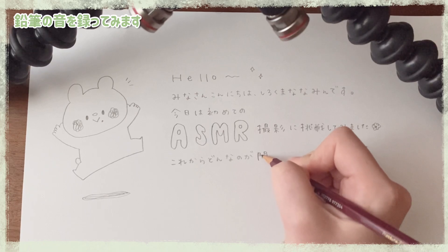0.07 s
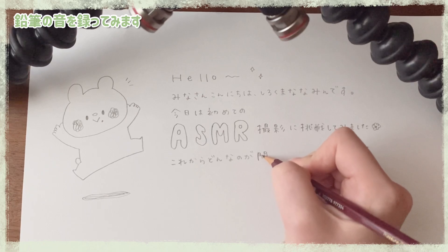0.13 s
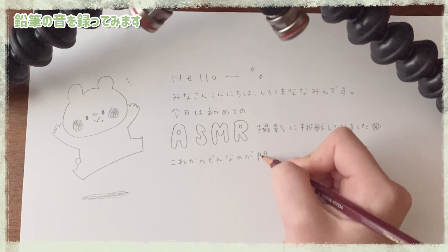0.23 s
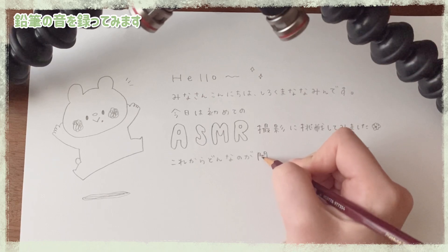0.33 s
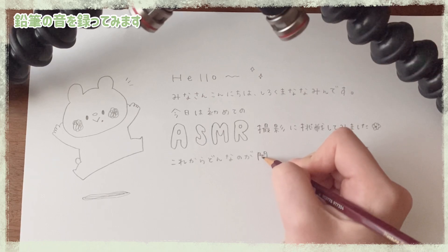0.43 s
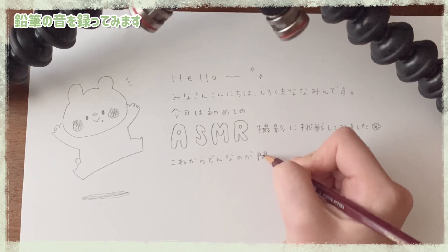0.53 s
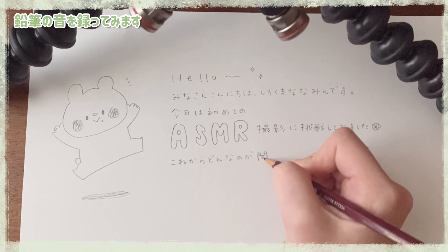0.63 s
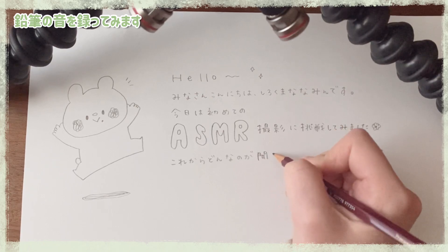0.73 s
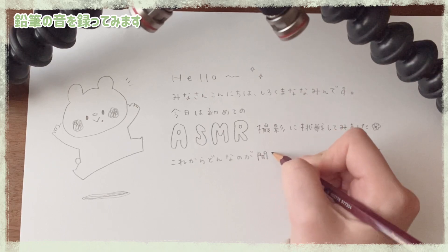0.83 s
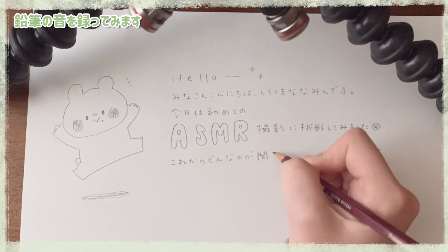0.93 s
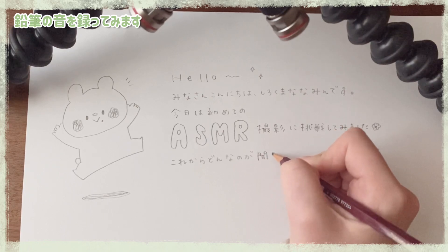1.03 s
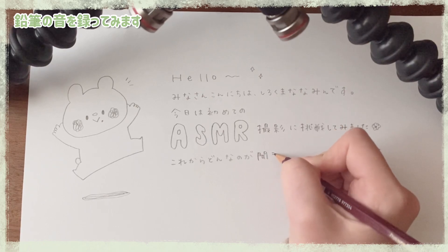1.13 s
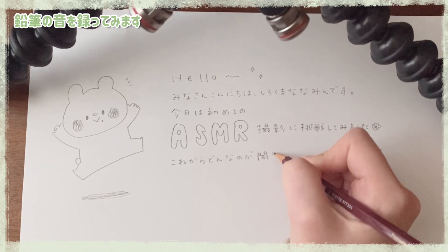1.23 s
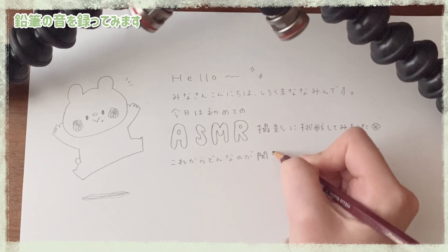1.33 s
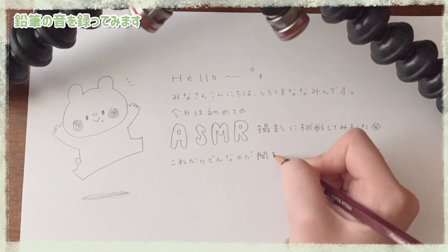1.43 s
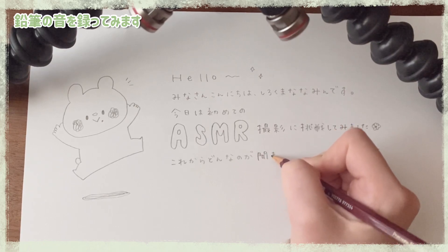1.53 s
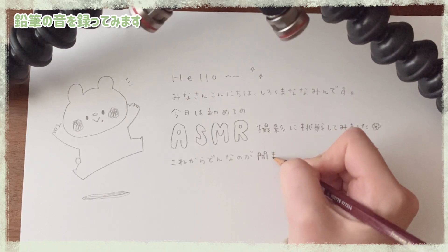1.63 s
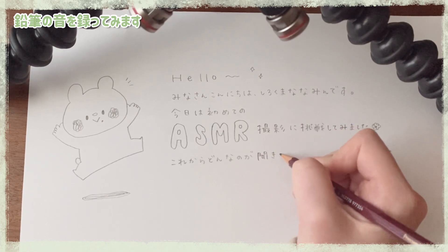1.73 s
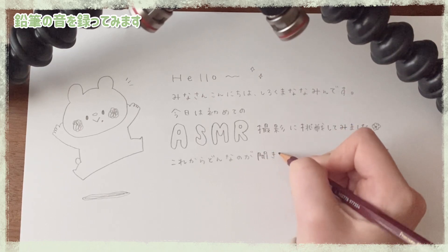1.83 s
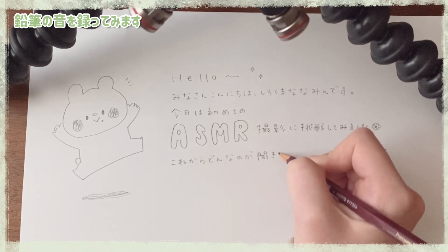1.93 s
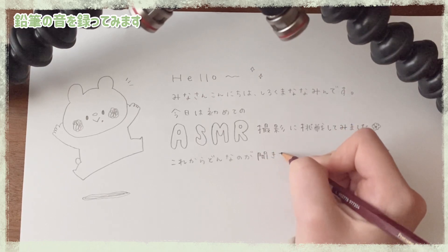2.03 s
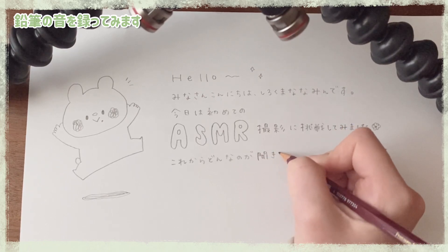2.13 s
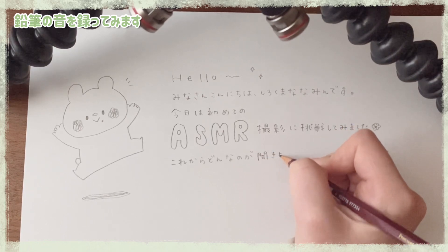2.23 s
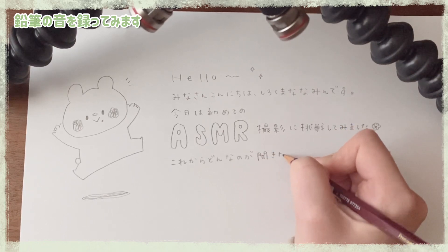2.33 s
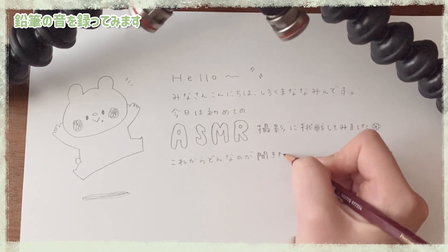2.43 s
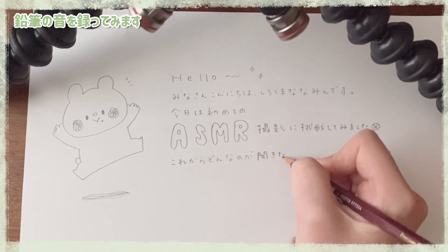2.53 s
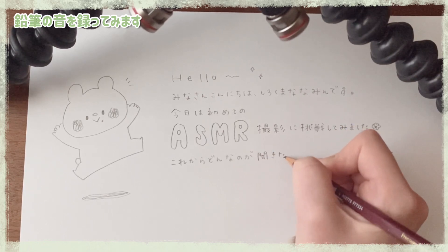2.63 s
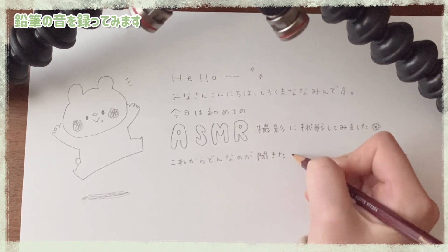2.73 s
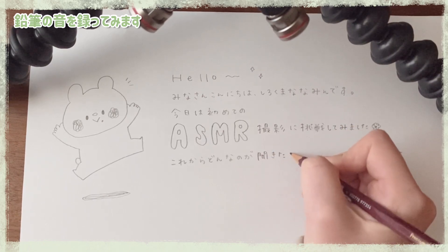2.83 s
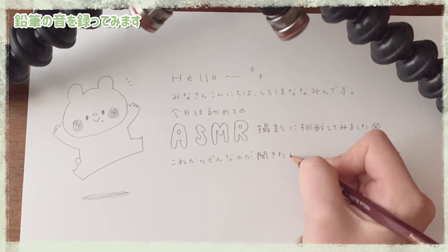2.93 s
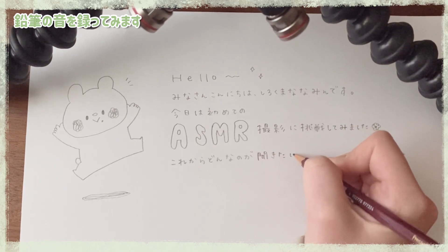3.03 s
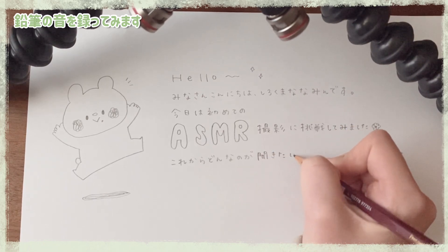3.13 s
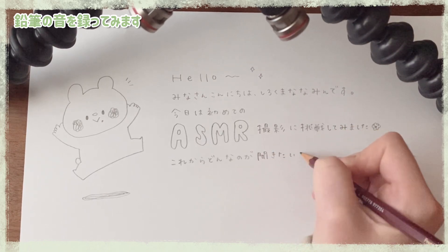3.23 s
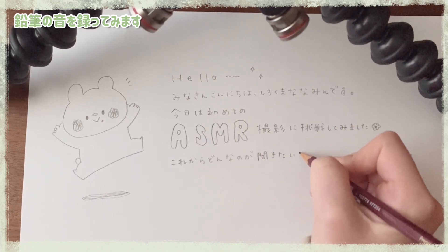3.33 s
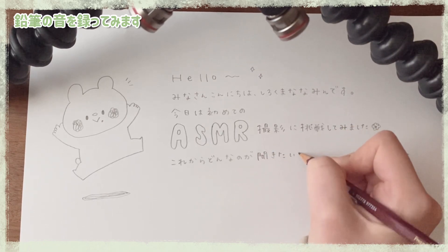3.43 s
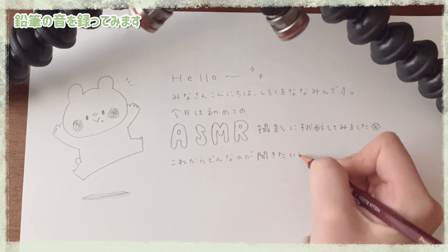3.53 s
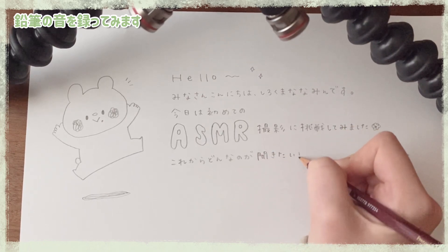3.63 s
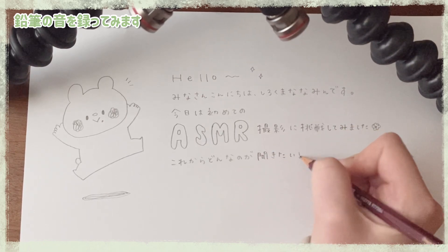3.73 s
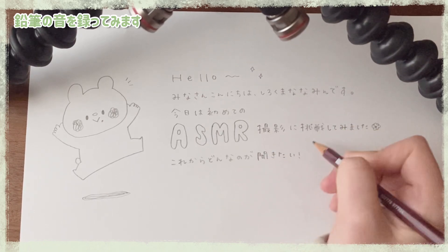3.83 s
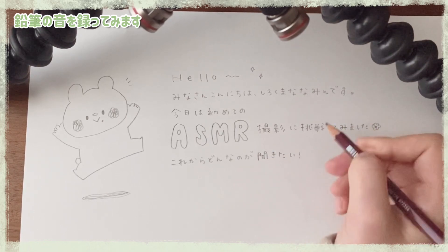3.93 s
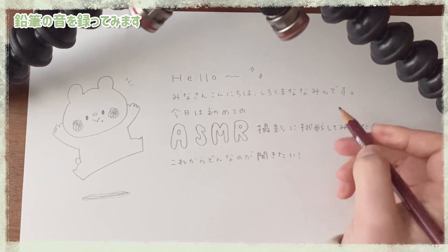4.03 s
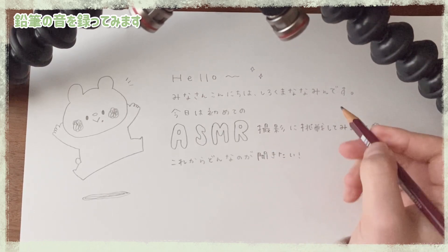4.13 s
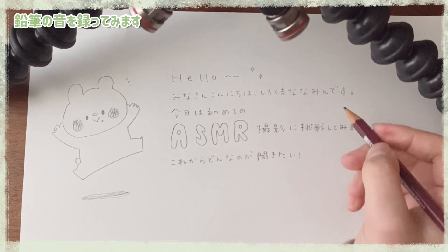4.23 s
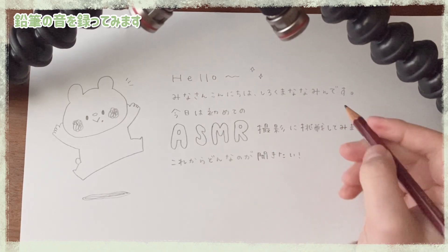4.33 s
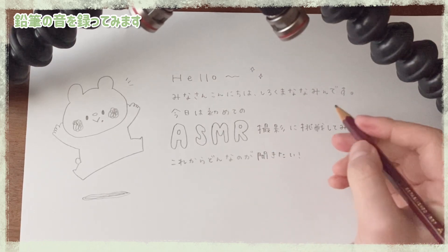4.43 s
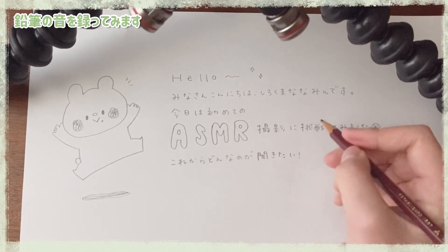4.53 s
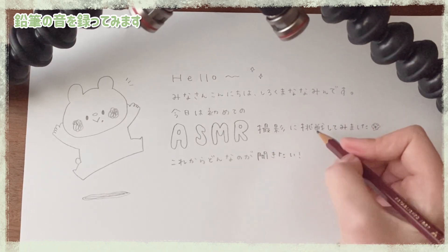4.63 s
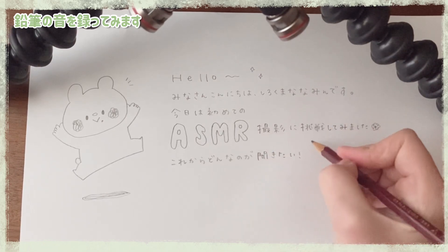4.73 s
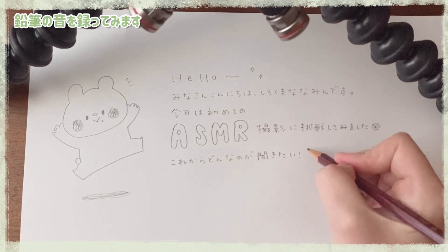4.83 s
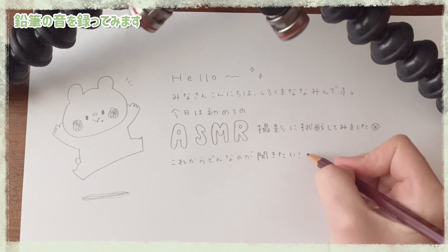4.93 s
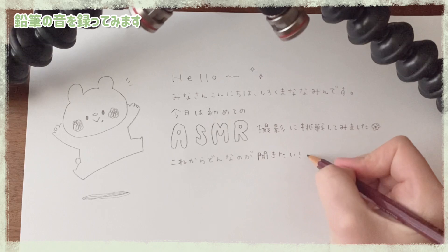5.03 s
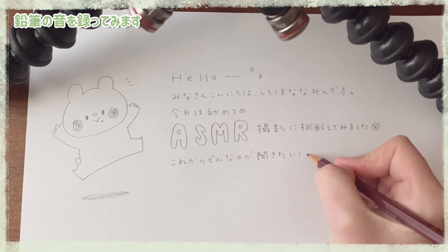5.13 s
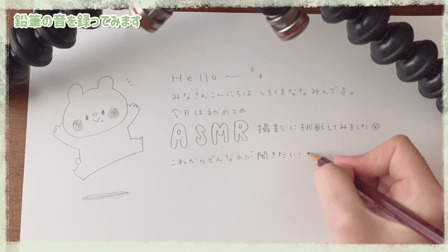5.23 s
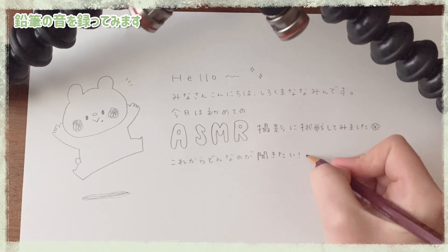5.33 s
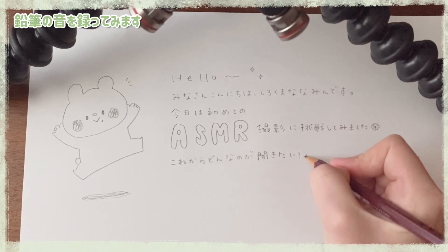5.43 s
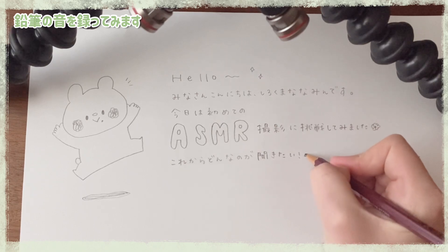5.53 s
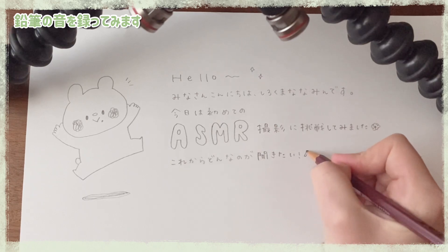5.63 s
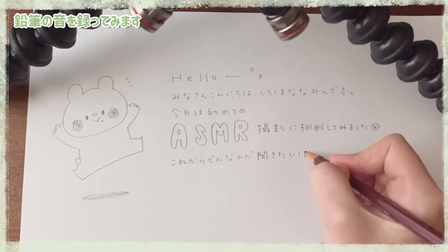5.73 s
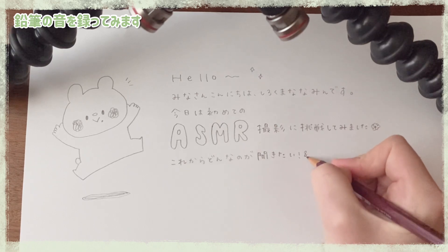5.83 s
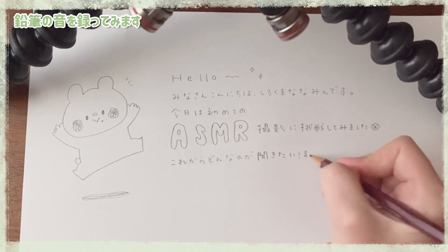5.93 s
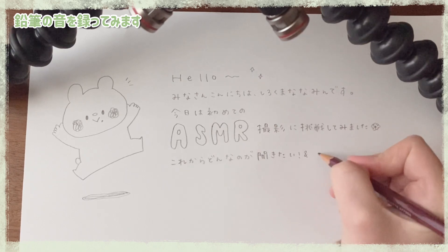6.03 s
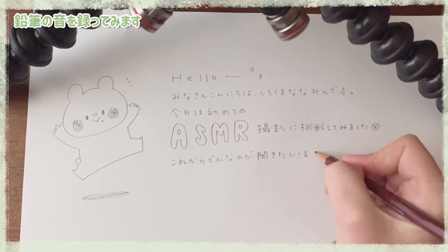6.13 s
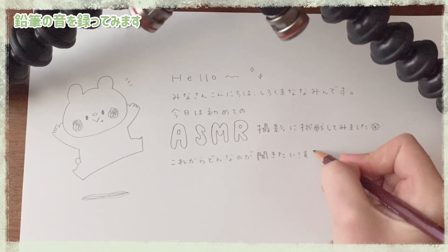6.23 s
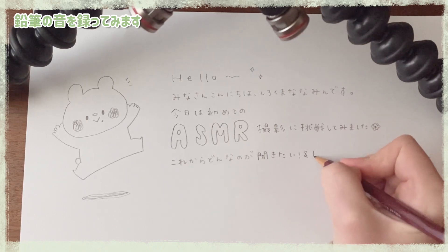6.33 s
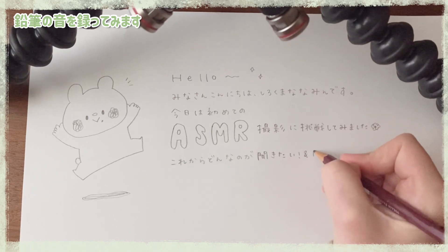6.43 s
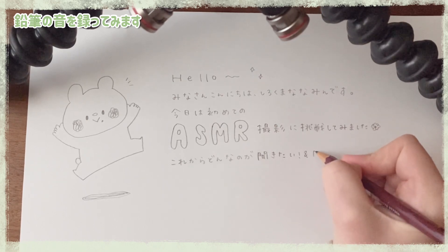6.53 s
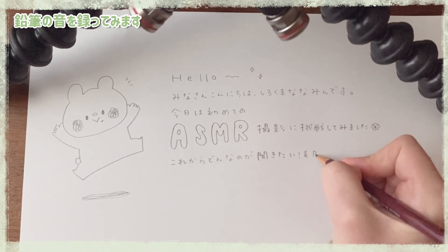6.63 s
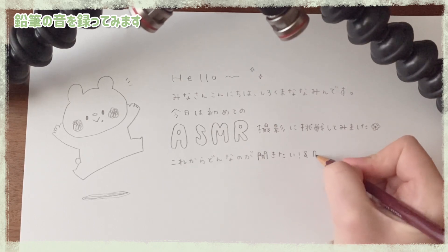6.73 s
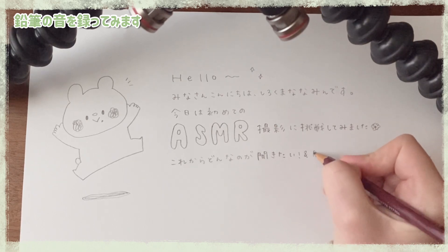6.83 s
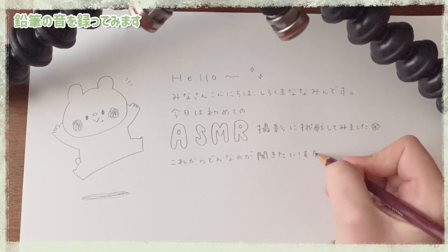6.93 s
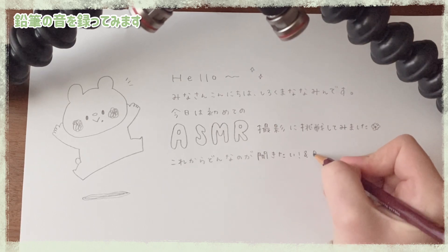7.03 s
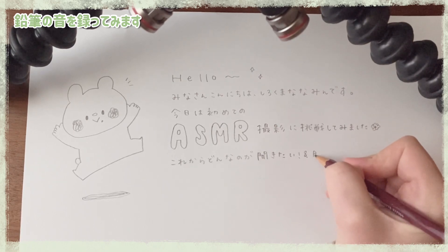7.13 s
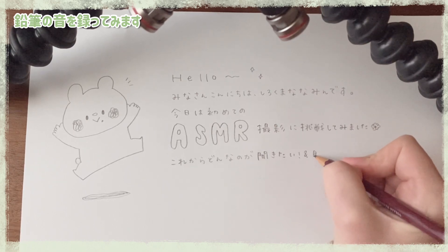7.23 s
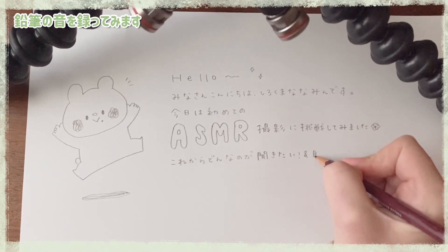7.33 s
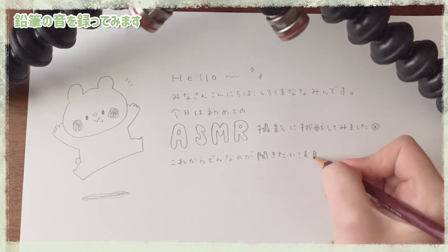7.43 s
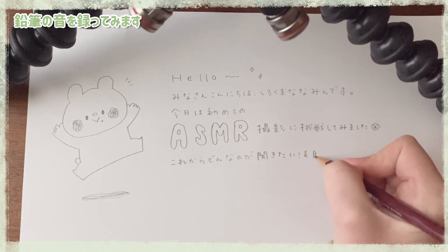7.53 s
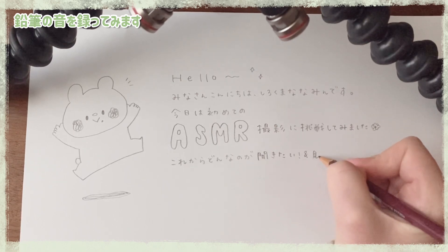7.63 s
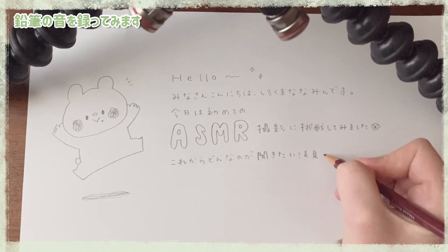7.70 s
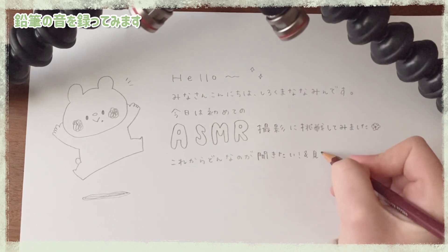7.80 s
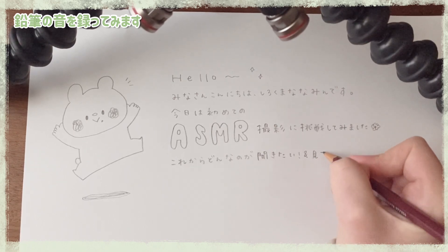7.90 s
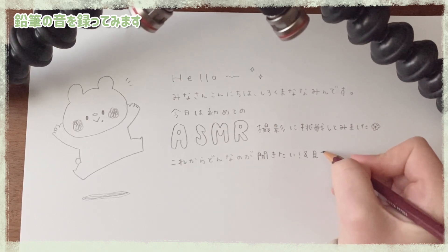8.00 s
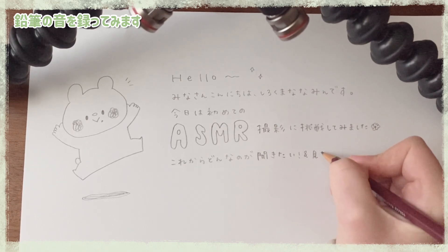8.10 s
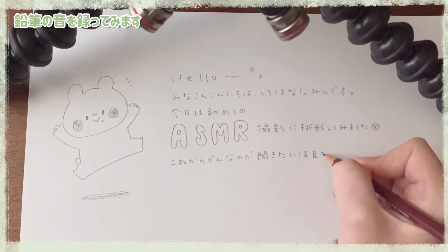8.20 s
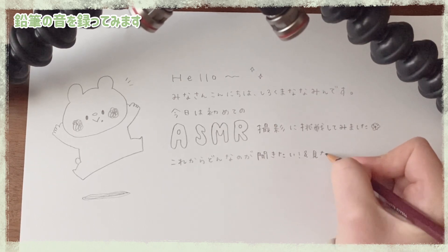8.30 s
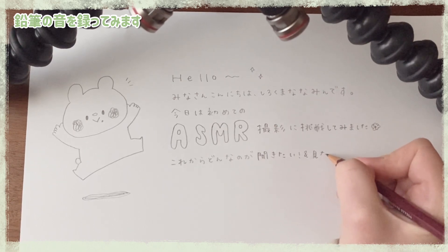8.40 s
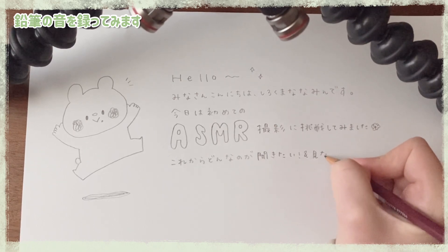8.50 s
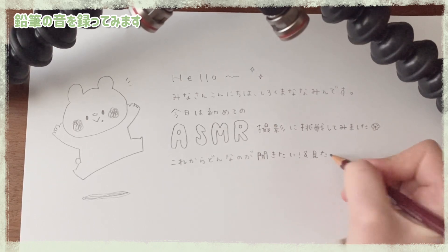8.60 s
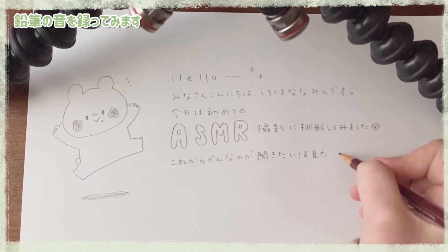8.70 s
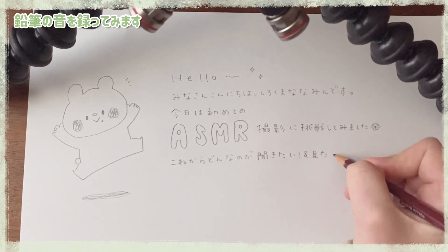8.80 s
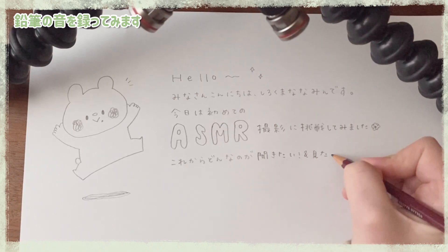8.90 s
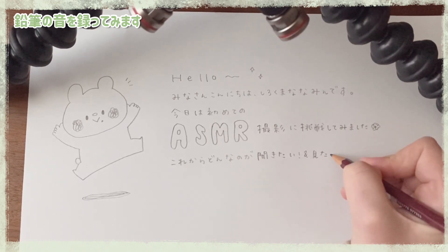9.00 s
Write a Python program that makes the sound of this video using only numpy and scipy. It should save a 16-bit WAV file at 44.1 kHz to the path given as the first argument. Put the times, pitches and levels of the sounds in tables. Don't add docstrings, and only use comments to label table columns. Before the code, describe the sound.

Very close stereo sound of a pencil on paper on a wooden desk, in a quiet room with faint low hum and soft microphone hiss. From 0 to 3.7 seconds, small characters are written: each tip landing gives a short woody knock, followed by a dry, bright scratch of about a tenth of a second, three to five strokes per second, irregular. A stronger knock falls near 2.35. Soft skin brushes pass at 0.7, 1.7, 2.7 and 3.2, with low rumble from the shifting hand. From about 3.8 to 5.3 the pencil lifts; only faint sliding, dull finger ticks and tiny crackles remain. Writing resumes at 5.3 with a light tap and softer overlapping scratches, a broad hand brush near 6, then crisper knocks and clear strokes from 6.2 to 8.6. A final brush and paper tick come around 8.6, then small ticks and quiet to about 9.

```python
import sys
import numpy as np
from scipy import signal
from scipy.fft import rfft, irfft
from scipy.io import wavfile
from scipy.ndimage import uniform_filter1d

SR = 44100
rng = np.random.default_rng(int(sys.argv[2]) if len(sys.argv) > 2 else 0)


def unload_wav(signal):
    wavfile.write(
        sys.argv[1],
        SR,
        np.round(np.clip(np.atleast_2d(signal).T, -1, 1) * 32767).astype(np.int16),
    )


def ratio(d):
    e = np.asarray(d, float) / 20
    return 10 ** e


N = 399546
TIME = np.arange(N) / SR
RIGHT_LAG = 4

# pitch in Hz, level in dB per Hz.
ROOM_COLOUR = [(26, -38), (45, -23), (112, 5.5), (182, -4.5), (244, -10.5), (283, 0.5), (320, -5.5),
               (353, -8.5), (419, -7), (462, -4.5), (719, -8.5), (919, -11.5), (1330, -17.5), (4200, -23.5),
               (15800, -27.5)]
ROOM_DB = -60.5
# pitch in Hz, level in dB, size and sign at the right microphone (left is 1).
HUM = [(50, -55, -1), (282.3, -72.5, 0.96), (352, -82, 0.5), (468.4, -69.5, 0.016), (543, -85, -0.093),
       (797, -72.5, -0.16), (1553, -86, 1)]

# pitch in Hz, width in Hz, level in dB.
STAND = [(4, 6, -2), (17, 8, -2), (24.5, 5, 2), (38, 7, -12), (52, 5, -13), (80, 12, -12)]
# time in seconds, stand rocking in dB.
REST = [(0, -47), (3.7, -42.5), (4.2, -52), (4.9, -49), (5.25, -51.5), (5.8, -44), (6.5, -48), (8.7, -45),
        (9.06, -52)]
REST_PRESS_DB = -19.5
# time in seconds, stand rocking in
# dB, pressure on the desk in dB.
SHIFTS = [(0.0, -33, -51), (0.2, -41, -51), (0.36, -38.5, -54.5), (0.5, -36.5, -49), (0.64, -35, -47),
          (0.93, -42, -64), (1.03, -50, -53), (1.16, -42, -65), (1.39, -34.5, -59), (1.51, -38.5, -52),
          (1.72, -37, -47.5), (1.99, -38, -71), (2.19, -36, -52), (2.32, -48, -50), (2.43, -34, -50),
          (2.66, -33.5, -55), (2.92, -31.5, -49), (3.05, -35.5, -51.5), (3.199, -34, -64),
          (3.47, -32.5, -63), (3.72, -38, -48.5), (3.9, -42, -65),
          (4.99, -47.5, -60), (5.53, -40.5, -57), (5.58, -42, -47), (5.95, -36, -47),
                (6.03, -38.5, -60), (6.31, -38, -67), (6.79, -36, -52), (7.06, -35.5, -54),
                (7.15, -38, -46), (7.27, -39.5, -51), (7.47, -41, -58), (7.63, -38.5, -47),
                (7.73, -39.5, -66), (7.89, -35.5, -53), (8.15, -34, -50), (8.4, -41, -62), (8.65, -32, -62)]
SHIFT_RISE_S, ROCK_FALL_S, PRESS_FALL_S = 0.068, 0.12, 0.038

# pitch in Hz, time to fall by 60 dB in seconds,
# signed strength at the left and at the right microphone in thousandths.
DESK = [(30.8, 0.098, -61.7, 7.9), (45.8, 0.121, 39.3, 11.8), (69.0, 0.231, 16.4, -16.6),
        (100.2, 0.048, -41.8, 99.3), (109.5, 0.117, 44.7, -29.9), (135.0, 0.24, 13.0, 4.1),
        (171.2, 0.043, -17.2, -36.9), (213.2, 0.067, 83.4, 31.9), (223.1, 0.07, -76.6, -12.9),
        (255.2, 0.049, 6.1, -29.2), (315.1, 0.11, -5.4, -9.4), (422.0, 0.085, -10.0, -4.4),
        (459.8, 0.054, -13.4, -10.3), (515.0, 0.037, -8.8, -16.2), (621.1, 0.025, -9.9, -14.6),
        (724.0, 0.13, -3.3, -3.5), (804.4, 0.052, 4.9, 13.5), (888.0, 0.061, 13.6, 6.2),
        (947.7, 0.076, -6.8, -8.2), (1108.2, 0.024, -27.9, 5.4), (1157.9, 0.004, -12.1, -82.5),
        (1471.2, 0.037, 7.2, -10.7), (2104.5, 0.013, -130.1, -86.1), (3248.1, 0.009, -255.2, -31.5)]
DIRECT = (-.63, -.15)

# time in seconds, level in dB, pitch in Hz, left minus right in dB.
TICKS = [(0.3721, -51, 1460, -5), (1.2471, -54, 1200, -1), (1.527, -49, 1260, -2.5),
         (2.0797, -48, 1210, -2.5), (2.2944, -49, 1470, -0.5), (2.689, -45, 1500, 0), (2.992, -51, 2000, 0),
         (3.213, -50, 1500, 0), (3.395, -50, 1800, 0), (4.2714, -58, 7670, 1.0), (4.2904, -54, 1503, 0.5),
         (3.7952, -45, 1610, 1), (3.9259, -51, 923, 1.5), (4.5612, -46.5, 1360, -3), (4.8309, -44, 985, 1),
         (5.108, -48, 1200, -6), (5.3844, -51, 1390, 1.0), (5.9376, -49, 1200, 3), (6.4174, -49, 1220, 0.5),
         (6.724, -50, 2020, 1.0), (6.7594, -46.5, 1550, -2), (8.411, -48, 1220, -0.5),
         (8.4344, -51, 1230, 1.0), (8.6227, -40, 1450, 6), (8.9044, -50, 1400, -4),
         (8.9537, -51, 1590, 0.0)]
# time in seconds, level in dB, pitch in Hz, left minus right in dB.
CRACKLES = [(0.8861, -55, 12000, 4.0), (1.694, -46, 10400, 5), (3.9794, -52, 7540, 0.0),
            (4.4, -49, 8000, 3.0), (4.4308, -49, 8000, 1.5), (5.2697, -51, 8500, 8),
            (6.2220, -47, 11500, 7), (6.4406, -55, 11000, 2.0), (6.749, -54, 10900, 0.5),
            (6.851, -53, 11500, 3.0), (7.8453, -54, 11500, 3.5), (8.2879, -44.5, 11000, 6),
            (8.4922, -51, 9500, 3.0), (8.6227, -47, 9000, 3)]
TICK_FADE_MS, CRACKLE_FADE_MS = 1.5, 0.6

# start in seconds, rise in ms, fall in ms, high level in dB,
# middle over high in dB.
SLIDES = [(0.7, 45, 39, -60.5, 0.5), (1.723, 47, 41, -55.5, 3), (2.684, 63, 49, -55.5, 4),
          (3.209, 50, 58, -53.5, 1.5), (3.788, 20, 71, -63, -1), (3.9, 140, 190, -64.5, -0.5),
          (3.96, 11, 10, -71, -11), (4.15, 160, 300, -75, 7), (4.257, 12, 33, -75, -12),
          (4.379, 25, 63, -71.5, -19), (4.526, 27, 24, -66, -18), (4.7, 43, 150, -67, -1.5),
          (5.966, 44, 52, -50, -0.5), (7.6, 36, 16, -63, 0), (7.67, 13, 58, -62, -3),
          (8.628, 61, 84, -48, 0)]
LOW_UNDER_MIDDLE_DB = -3
# pitch in Hz, width in Hz, level in dB.
SKIN = [
    [(7570, 1700, 6), (10900, 2100, 4), (13500, 3200, 0)],
    [(3140, 790, 0), (4780, 2060, 0)],
    [(2090, 340, 0), (1480, 250, -1.5), (960, 500, -6.5)],
]

# start in seconds, rise in ms, fall in ms, paper hiss
# in dB, grip in dB.
STROKES = [(0.092, 10, 58, -61, -2), (0.265, 15, 38, -61, -1.5), (0.434, 24, 30, -58, -1.5),
           (0.595, 23, 42, -49.5, -0.5), (0.918, 27, 41, -58, 0.5), (1.104, 29, 57, -58, -1),
           (1.368, 14, 58, -48.5, -0.5), (1.603, 15, 93, -58.5, 0.5), (1.958, 23, 57, -59, 2.5),
           (2.157, 30, 43, -49, 1.5), (2.261, 7.4, 45, -69, -6.5), (2.386, 4.5, 36, -56, -1.5),
           (2.582, 72, 9.6, -61, 0), (2.911, 13.3, 48, -50, 0), (3.008, 11, 6.8, -54.5, -10),
           (3.129, 16.5, 41, -54, 1), (3.451, 12.5, 51, -51.5, 0), (3.652, 20, 48, -64, -1),
           (5.322, 10, 51, -59.5, -3), (5.404, 19, 93, -66.5, 0), (5.524, 53, 118, -56.5, 2.5),
                 (5.7, 36, 25, -63, -1.5), (5.755, 70, 74, -53.5, -2), (5.897, 13, 13, -63, -8),
                 (6.275, 16, 70, -46.5, -1), (6.459, 5.3, 15, -61.5, -4), (6.497, 22, 72, -60.5, -3.5),
                 (6.612, 62, 33, -51, 1.5), (6.885, 19, 36, -58.5, -0.5), (7.073, 20, 32, -59.5, -2.5),
                 (7.248, 20, 38, -57.5, -0.5), (7.332, 87, 20, -61.5, -3), (7.551, 18, 94, -58, -1),
                 (7.892, 10.5, 62, -56.5, 0.5), (8.114, 26, 50, -51.5, 0), (8.31, 18, 50, -59, 0),
                 (8.53, 24, 38, -56, 0)]
USUAL_HISS_DB, GRIP_TO_SCRAPE = -57, 0.75
SCRAPE_OVER_DB, SCRAPE_LAG = -5.5, 0.39
SHAFT_OVER_DB, SHAFT_LAG = -2.5, 0.62
# time in seconds, scrape in dB.
STEEPNESS = [(0, 1), (0.6, 1), (1.0, 1.5), (1.4, 3), (2.0, 1), (2.6, -1), (3.0, 2), (3.6, 1), (5.3, -1),
             (5.6, -1.5), (5.9, 1), (6.3, 0.5), (6.7, 0.5), (7.3, 2), (7.9, 2), (8.2, 2.5), (8.6, 1)]
# pitch in Hz, width in Hz, level in dB, left minus right in dB.
HISS = [(7340, 1100, 0, 5.5), (9000, 1200, -1, 3), (10400, 1150, 0, 7), (11500, 570, 1, 3.5),
        (13500, 1800, -3.5, 3), (15400, 700, -9, 2.5)]
MIDDLE_HISS = [(6540, 600, -1, 7), (7900, 800, 0, 3), (10200, 860, 3, 3), (11400, 900, 1, 5),
               (12700, 600, 0, 2), (15000, 1500, -10, 2.5)]
LATER_HISS = [(7550, 830, 2.5, 5.5), (9600, 500, -3.5, -4), (10640, 960, 2.5, 3.5), (12000, 1100, 1, 0),
              (13300, 1400, 1.5, -0.5), (15600, 400, -6, 0)]
HAND_MOVES_S = (2.75, 4.5)
# pitch in Hz, width in Hz, level in dB, left minus right in dB.
SCRAPE = [(2630, 94, 0.5, -4), (3070, 110, 5, 0), (3273, 170, 4, 8.5), (3710, 150, 0.5, 3.5),
          (4000, 250, -2.5, 8), (4440, 130, 4, -1), (4860, 250, 3, 1), (5400, 280, -3, -7)]
# pitch in Hz, width in Hz, level in dB.
SHAFT = [(864, 123, -2.5), (1104, 173, -4.5), (1488, 130, -3), (1944, 116, -1.5), (2068, 82, 3.5),
         (2324, 340, -7.5)]
ECHO_NOTCH_HZ, ECHO_NOTCH_WIDTH_HZ = 5650, 230

# time in seconds, blow in dB, sharp edge in dB, first touch in dB.
TAPS = [(0.06, -25.5, -4, -35), (0.2298, -27.5, -2, -35), (0.404, -22, -4, -37), (0.565, -26.5, -3, -33),
        (0.8887, -23, -6, -33), (1.0778, -30.5, -1, -35), (1.3124, -25, -3, -35), (1.5876, -21.5, -1, -29),
        (1.9266, -23, -8, -26), (2.1324, -25, -11, -27), (2.3474, -14.5, -3.5, -40),
        (2.5595, -24, -12, -39), (2.871, -23, -5, -35), (3.0978, -17, -4, -42), (3.4155, -21.5, -8, -29),
        (3.643, -16, -6, -29), (5.3145, -24.5, 1, -16.5), (6.2381, -18, 3.5, -40), (6.4487, -20, -5, -31),
        (6.8541, -15.5, 1, -43), (7.0446, -17, -4, -27), (7.2232, -18, 0, -29), (7.5431, -21, 1, -33),
        (7.8542, -16, -0.5, -33), (8.0605, -24, -3, -32), (8.2929, -17, 1.5, -39), (8.4978, -16, -1.5, -29)]
SOFT_CONTACT_MS, HARD_CONTACT_MS, SOFT_BLOW_DB, CONTACT_MS_PER_DB = 1.377, 0.88, -24, 0.14
# pitch in Hz, width in Hz, level in dB.
KNOCK = [(1527, 95, 7.5), (1920, 110, -10), (2066, 30, 3), (2520, 520, -19), (3210, 140, -1.5),
         (4090, 650, -11.5)]
# pitch in Hz, width in Hz, level in dB.
CLACK = [(1800, 480, -1)]


def unit(x):
    return x / np.sqrt(np.mean(x ** 2))


def tilt(db):
    return np.array([[db], [-db]]) / 2


def walk(rate):
    hold = int(SR / rate)
    steps = np.repeat(rng.standard_normal(N // hold + 1), hold)
    return unit(uniform_filter1d(uniform_filter1d(steps, hold), hold)[:N])


def window(s, ms):
    span = slice(max(int(s * SR) + 1, 0), min(int(s * SR + ms * SR / 1000), N))
    return span, (TIME[span] - s) * 1000


def pulse(age, ms):
    return np.sin(np.pi * np.clip(age / ms, 0, 1)) ** 2


def pair(alike):
    shared, left, right = rng.standard_normal((3, N))
    common = np.array([shared, np.roll(shared, RIGHT_LAG)])
    return np.sqrt(alike) * common + np.sqrt(1 - alike) * np.array([left, right])


def resonate(x, modes, drift_db=0.):
    total = 0
    for k, (hz, width, db, *pan_db) in enumerate(modes):
        ring = signal.lfilter(*signal.iirpeak(hz, hz / width, SR), x)
        if drift_db:
            db = db + drift_db * walk(6.02)[:x.shape[-1]]
        ring = (-1) ** k * ratio(db) * ring
        if pan_db:
            ring = ratio(tilt(pan_db[0])) * ring
        total = total + ring
    return total


def envelopes(table, edge_ms, rise, fall, fade=(1, 1, 1)):
    out = np.zeros((3, N))
    for start, rise_ms, fall_ms, db, *layer_db in table:
        corners = np.cumsum([0, edge_ms + abs(rise_ms), edge_ms + abs(fall_ms)])
        span, age = window(start - edge_ms / 1000, corners[-1])
        swell = np.sin(np.pi * np.interp(age, corners, [0, 1, 2]) / 2).clip(0)
        shape = np.where(age < corners[1], rise, fall * np.array(fade)[:, None])
        out[:, span] += ratio(db + np.array([0, *layer_db]))[:, None] * swell ** shape
    return out


def room():
    hz = np.fft.rfftfreq(N, 1 / SR) + 1
    alike = .5 * np.exp(-np.log(hz / 350) ** 2 / 1.07)
    shared, left, right = rfft(rng.standard_normal((3, N)))
    mixed = np.sqrt(alike) * shared + np.sqrt(1 - alike) * np.array([left, right])
    colour_hz, colour_db = np.transpose(ROOM_COLOUR)
    colour = ratio(np.interp(np.log(hz), np.log(colour_hz), colour_db))
    air = ratio(ROOM_DB + 4.0 + .5 * walk(1.59)) * unit(irfft(colour * mixed, N))
    hum = np.zeros((2, N))
    for tone_hz, db, sign in HUM:
        tone = np.sin(2 * np.pi * tone_hz * TIME + 0.8 * walk(4))
        hum += ratio(db + 3.0 + 1.3 * walk(2.7)) * tone * np.array([[1], [sign]])
    return air + hum + ratio(-70.5) * rng.standard_normal((2, N))


def desk(force):
    t = TIME[:SR // 2]
    hz, t60, *shape = np.transpose(DESK)
    fades = np.exp(-np.log(1000) * t / t60[:, None])
    rings = fades * np.sin(2 * np.pi * hz[:, None] * t)
    answer = np.array(shape) @ rings / 1000
    answer[:, 0] = DIRECT
    return signal.fftconvolve(answer, force[None], axes=1)[:, :N]


def shake(drag, db):
    force = np.convolve(rng.standard_normal(N), pulse(TIME[:60] * 1000, 1.06), "same")
    return ratio(db) * desk(force * drag) / np.std(desk(force))


def low(x, top_hz):
    return signal.sosfilt(signal.butter(2, [70, top_hz], "bp", fs=SR, output="sos"), x)


def hand():
    rock = ratio(np.interp(TIME, *np.transpose(REST)))
    press = rock * ratio(REST_PRESS_DB)
    for s, rock_db, press_db in SHIFTS:
        span, age = window(s - .25, 650)
        age = age / 1000 - .25
        rise = np.exp(np.minimum(age, 0) / SHIFT_RISE_S)
        age = np.maximum(age, 0)
        rock[span] = np.maximum(rock[span], ratio(rock_db) * rise * np.exp(-age / ROCK_FALL_S))
        press[span] = np.maximum(press[span], ratio(press_db) * rise * np.exp(-age / PRESS_FALL_S))
    return rock, press


def rumble():
    sway = [(13.5, 36.6, 0)]
    rock, left, right = (resonate(resonate(rng.standard_normal(N), STAND), sway) for _ in range(3))
    rocking, pressure = hand()
    stand = rocking * ratio(6.5) * unit(np.array([left + 0.5 * rock, right - 0.58 * rock]))
    return stand + low(shake(pressure, 1.8), top_hz=226)


def ticks():
    out = np.zeros((2, N))
    noise = rng.standard_normal(N)
    for table, fade_ms in ((TICKS, TICK_FADE_MS), (CRACKLES, CRACKLE_FADE_MS)):
        for s, db, hz, pan_db in table:
            span, age = window(s, 30)
            band = [(hz, 1.35 * hz, 1.5)]
            burst = resonate(resonate(noise[span] * np.exp(-age / fade_ms), band), band)
            out[:, span] += ratio(db + 2.5 + tilt(pan_db)) * burst
    return out


def slides():
    table = [(*row, row[-1] + LOW_UNDER_MIDDLE_DB) for row in SLIDES]
    levels = envelopes(table, edge_ms=5.3, rise=1.47, fall=1.11)
    brush = np.zeros((2, N))
    for level, modes in zip(levels, SKIN):
        brush += level * unit(resonate(pair(0.49), modes, drift_db=1.5))
    return brush * ratio(4.0 + 1.1 * walk(66) + tilt(3.0)) + shake(levels[2], -2.3)


def stroke_layers():
    layers = []
    for *row, db, grip_db in STROKES:
        faster_db = db - USUAL_HISS_DB
        scrape_db = SCRAPE_OVER_DB - SCRAPE_LAG * faster_db + GRIP_TO_SCRAPE * grip_db
        shaft_db = SHAFT_OVER_DB - SHAFT_LAG * faster_db + grip_db
        layers.append((*row, db, scrape_db, shaft_db))
    return layers


def hiss_colour(noise):
    parts = np.split(noise, (np.array(HAND_MOVES_S) * SR).astype(int), axis=1)
    colours = (HISS, MIDDLE_HISS, LATER_HISS)
    return np.hstack([unit(resonate(part, modes, drift_db=1.0)) for part, modes in zip(parts, colours)])


def strokes():
    hiss, scrape, shaft = envelopes(stroke_layers(), edge_ms=1.5, rise=.45, fall=1.3, fade=(1, .8, .5))
    drag = ratio(.9 * walk(45) + 1.6 * walk(400))
    steep = ratio(2.5 + np.interp(TIME, *np.transpose(STEEPNESS)))
    grain = hiss * hiss_colour(pair(.58))
    scraping = steep * scrape * unit(resonate(pair(0.51), SCRAPE, drift_db=1.5))
    ring = ratio(4.0) * shaft * unit(resonate(pair(0.8), SHAFT, drift_db=0.44))
    heard = drag * ratio(1.5 + tilt(0.4)) * (grain + scraping + ring)
    return heard + shake(drag * shaft, 8.6) + low(shake(drag * shaft, 10.8), top_hz=150)


def taps():
    push, edge, crack, settle, clack = np.zeros((5, N))
    for s, db, edge_db, touch_db in TAPS:
        span, age = window(s + .0013, 40)
        contact_ms = SOFT_CONTACT_MS - CONTACT_MS_PER_DB * max(db - SOFT_BLOW_DB, 0)
        push[span] += ratio(db - 5.0) * pulse(age, max(contact_ms, HARD_CONTACT_MS))
        edge[span] -= ratio(db + edge_db + 3.0) * pulse(age, 0.094)
        crack[span] += ratio(db + edge_db - 24) * np.exp(-age / 0.9)
        clack[span] += ratio(db + 0.6 * edge_db - 15.5) * np.exp(-age / 3.0)
        settle[span] += ratio(db) * np.exp(-age / 15.4)
        span, age = window(s - .0035, 20)
        crack[span] += ratio(db + touch_db + 1.5) * np.exp(-age / 1.2)
    ring = resonate(edge, KNOCK)
    ring = np.array([ring, ratio(-3.0) * np.roll(ring, RIGHT_LAG)])
    cracking = resonate(crack * pair(0.2), HISS + SCRAPE)
    clacking = resonate(clack * pair(0.75), CLACK)
    return desk(push) + shake(settle, -15.5) + ring + cracking + clacking


def scene():
    notch = signal.iirnotch(ECHO_NOTCH_HZ, ECHO_NOTCH_HZ / ECHO_NOTCH_WIDTH_HZ, SR)
    rubbing = signal.lfilter(*notch, slides() + strokes())
    return room() + rumble() + ticks() + rubbing + taps()


def low_pass(x):
    return signal.sosfilt(signal.butter(12, 16830, fs=SR, output="sos"), x)


def record(dry):
    mix = signal.sosfilt(signal.ellip(8, .2, 40, 15850, fs=SR, output="sos"), dry)
    return low_pass(mix)


dry = scene()
out = record(dry)
unload_wav(out)
```